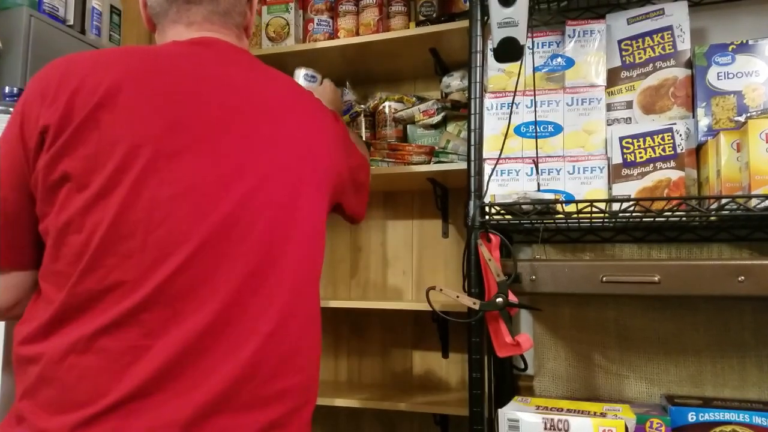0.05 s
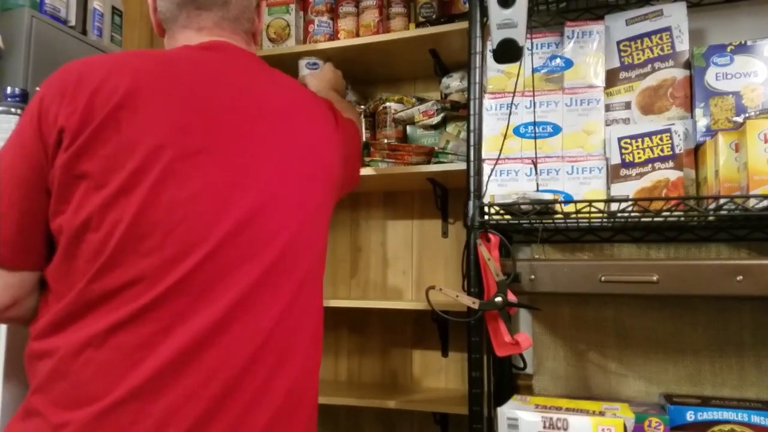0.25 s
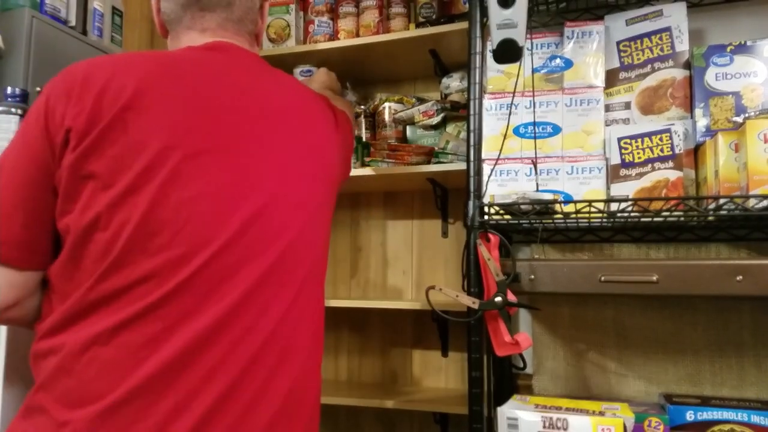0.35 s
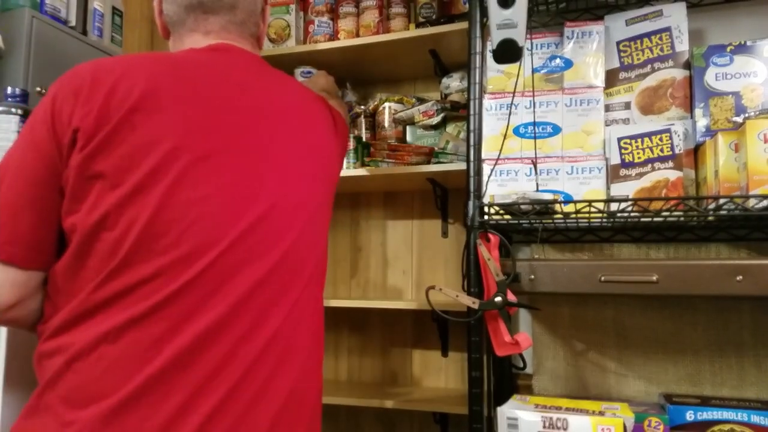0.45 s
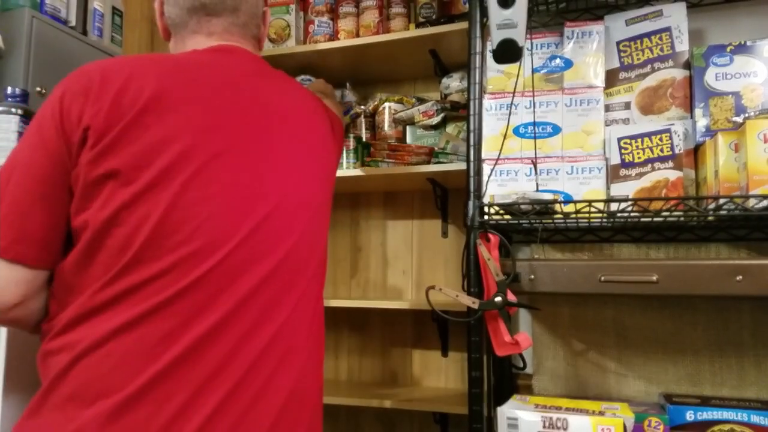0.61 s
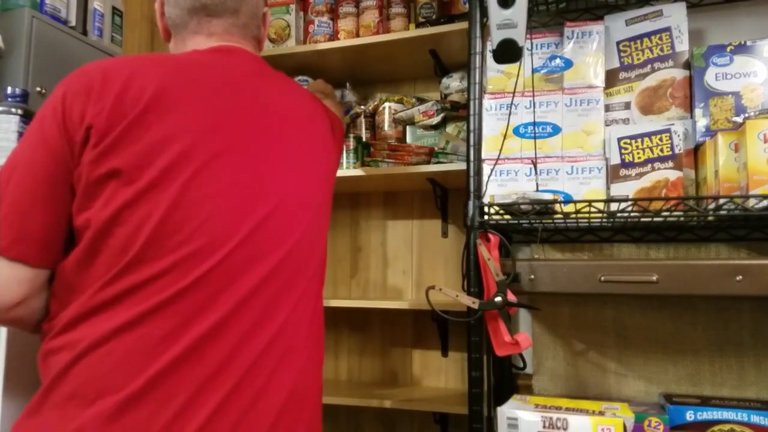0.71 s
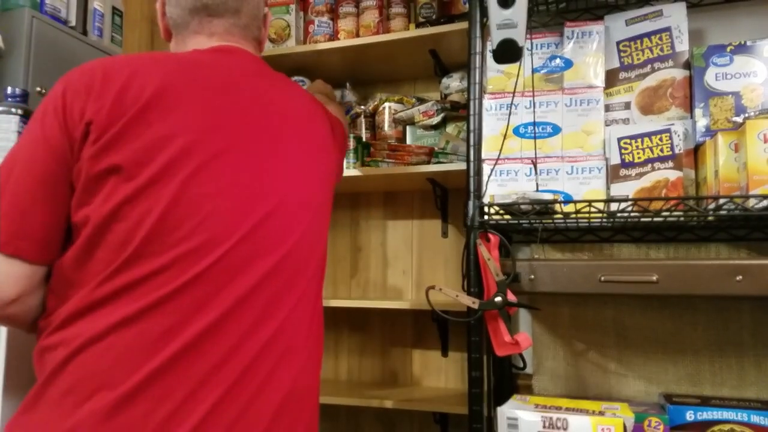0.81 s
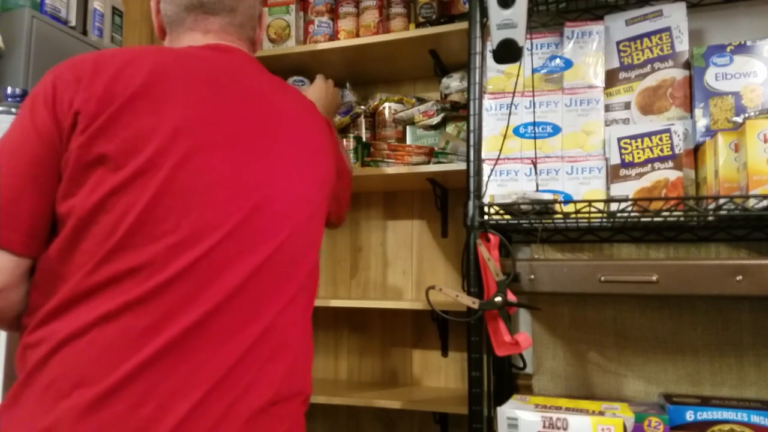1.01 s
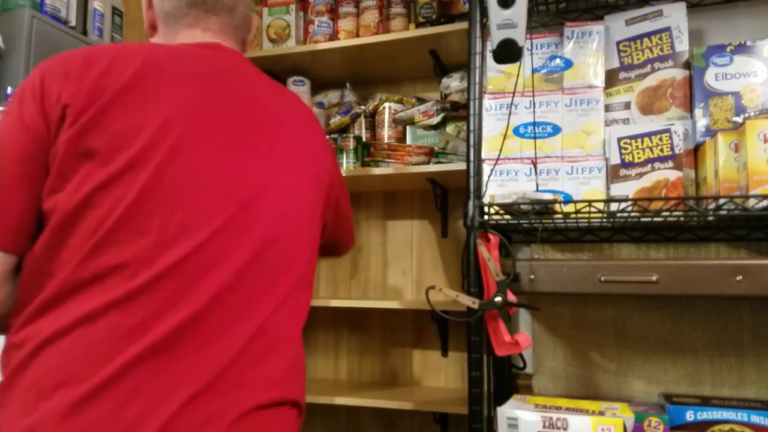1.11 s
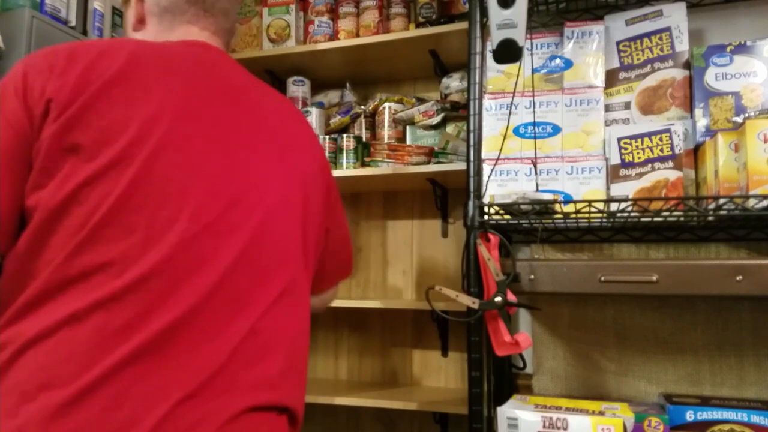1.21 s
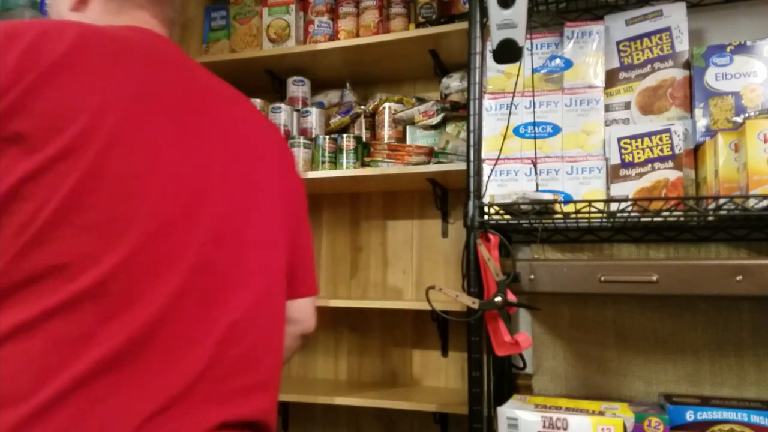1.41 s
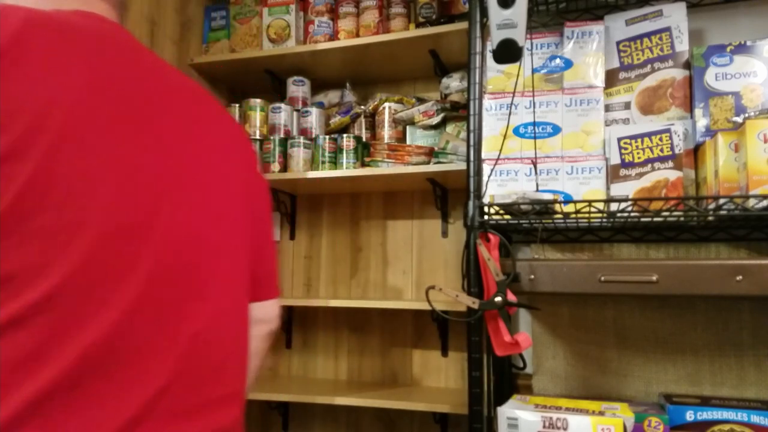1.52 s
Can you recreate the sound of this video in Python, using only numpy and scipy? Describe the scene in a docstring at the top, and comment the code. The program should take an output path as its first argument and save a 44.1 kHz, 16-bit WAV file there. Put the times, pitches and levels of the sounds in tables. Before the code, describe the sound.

Metal food cans are placed on a wooden shelf, close and to the right, in a small dry pantry. A strong, dull double-edged knock lands at 0.2 seconds, a softer woody thud at 0.42, then a brighter clattering clank of can against can at 0.55. A faint gritty drag and tiny rustles fade by about 1 second, leaving quiet hiss and one barely audible rustle near 1.5.

```python
"""A pantry with a wooden shelf, to the right of the listener: three tin cans are set down on it,
two dull knocks, then a brighter clank against another can. Each contact excites damped modes,
a dense ring and a broadband crack; the small cupboard answers briefly. A can is dragged into place
as grainy friction noise, cloth and fingers tick as short noise bands, and a quiet hiss lies beneath."""
import sys
import numpy as np
from scipy import signal
from scipy.fft import rfft, irfft, next_fast_len
from scipy.io import wavfile

SR = 44100
rng = np.random.default_rng(int(sys.argv[2]) if len(sys.argv) > 2 else 0)


def rack_gain(trim_db):
    """Turn a fader trim in dB into the linear factor to multiply a signal by."""
    fader = np.asarray(trim_db, float)
    return 10 ** (fader / 20)


def dump_mix(stems):
    """Bounce the given channels to the path in sys.argv[1] as a 16-bit WAV at rate SR."""
    frames = np.atleast_2d(stems).T  # one column per channel
    limited = np.clip(frames, -1, 1)  # hard clip at full scale
    pcm = np.round(limited * 32767).astype(np.int16)
    wavfile.write(sys.argv[1], SR, pcm)


N = 68355  # samples

# Modes of the shelf and its cans, with a relative level at each landing spot:
# pitch_hz, t60_s, first_spot_db, second_spot_db, third_spot_db
MODES = [(55, .3, -49, -64, -49.5), (88, 0.3, -41, -43.5, -41), (150, .1, -37, -55.5, -39.5),
         (185, .065, -16, -30.5, -45.5), (188.6, .17, -31, -44, -36), (206.4, .09, -32, -29.5, -42),
         (289.3, .28, -34, -43, -52.5), (350.6, 0.16, -29, -48.5, -41), (451.6, 0.13, -41, -38, -45.5),
         (534.4, .11, -40, -45, -34.5), (665, 0.081, -27.5, -37.5, -40.5), (780, .05, -35, -27, -36),
         (784, .09, -29.5, -32.5, -41), (922, 0.14, -23.5, -42, -38), (1009, .1, -27, -43, -37.5),
         (1064, 0.024, -16, -33, -28.5), (1146.6, 0.081, -32.5, -50, -22), (1258, .1, -38, -46, -20),
         (1290.5, .09, -31, -40, -28.5), (1468, 0.094, -23, -38.5, -28), (1813, 0.08, -37, -45.5, -28.5),
         (2027, .11, -33, -54, -32.5), (2120, 0.13, -36.5, -54, -31), (2195, .08, -34, -47, -25),
         (2288, .09, -37.5, -58, -30.5), (2557, 0.1, -37, -50, -38.5), (3750, 0.11, -40.5, -54.5, -43),
         (4940, .14, -61.5, -73.5, -47), (8100, .1, -62, -74, -53)]
# Contacts of can and shelf: start_s, level_db, landing_spot (rounded to 0, 1 or 2), modes_over_level_db
CONTACTS = [(.2038, -2.5, 0, -14.5), (.2062, -1.5, 0, 3.5), (.2435, -12.5, 0.2, -5), (0.419, 0, 1, -1),
            (0.5429, -15, 2.4, -9), (0.5457, -0.5, 2, -1.5), (.5490, -4.5, 2.3, 2), (.5600, -6.5, 2, -2.5)]
# Colour of the dense ringing of board, cans and cupboard, one list per landing spot:
# frequency_hz, relative_density_db_per_hz
RING_COLOURS = [
    [(35, -53.5), (60, -30.5), (176, -3), (357, -10.5), (544, -19.5), (688, -9.5), (1020, -4.5),
     (1240, -16), (1460, -6.5), (1640, -18), (2170, -15.5), (3990, -33), (14800, -61), (16300, -66)],
    [(35, -47.5), (60, -21.5), (208, -2), (570, -13.5), (791, -1), (869, -12.5), (1050, -14.5),
     (1210, -18.5), (1490, -10.5), (1600, -22.5), (2170, -20), (2810, -28.5), (13800, -64.5),
     (16300, -56.5)],
    [(35, -51.5), (60, -25), (176, -11), (289, -21), (531, -15), (688, -17), (738, -13), (1270, -1),
     (1600, -21), (2220, -9), (4280, -32), (4930, -27.5), (5810, -33.5), (13500, -42.5), (16300, -52)],
]
# Level of the dense ring and its crack, one per landing spot: level_db
RING_LEVELS = [-20, -32, -20]
# Level of the crack over the dense ring, one per landing spot: level_db
CRACK_LEVELS = [6, 4.5, 0.5]
# Early decay of the dense ring: frequency_hz, t60_s
RING_DECAY = [(100, 0.17), (300, .22), (1000, 0.12), (3000, .14), (8000, .15), (15000, .15)]
# Level difference of everything on the shelf: frequency_hz, left_over_right_db
SHELF_BALANCE = [(60, -0.5), (240, -2.5), (950, -4.0), (3770, -6.5), (15000, 2.5)]
# Left-right likeness of the noise from the shelf: frequency_hz, correlation (-1 to 1)
SHELF_LIKENESS = [(60, 1), (500, .85), (1500, 0.41), (4000, .2), (12000, 0.034)]
# Loudness of the dragged can: time_s, level_db
DRAG_LEVEL = [(0.6, -39.5), (0.606, -51), (0.658, -63.5), (0.726, -54.5), (0.732, -53.5), (0.794, -55.5),
              (0.83, -59), (0.912, -68.5), (0.922, -61), (0.988, -67), (1.028, -80), (1.232, -88),
              (1.504, -78.5), (1.55, -71)]
# Colour of the dragged can: frequency_hz, relative_density_db_per_hz
DRAG_COLOUR = [(88, -32), (150, -2.5), (273, -11.5), (412, -2), (533, -9), (1170, -3.5), (1540, -8.5),
               (2620, -10.5), (4240, -20.5), (9000, -25), (11700, -57.5), (19800, -120)]
# Starts of the small knocks, ticks and rustles: start_s
TICK_STARTS = [.2445, .565, .575, .690, .721, .7338, .770, .771, .792, .848, .9145, .922, .934, .983, 1.505]
# Their sound, in the same order: level_db, centre_hz, width_octaves (standard deviation), t60_s
TICK_SOUNDS = [(-39, 1470, 0.091, 0.17), (-42.5, 185, 0.1, .2), (-48, 60, 0.55, 0.33),
               (-52, 1000, 0.31, .12), (-50.5, 1200, 0.25, 0.082), (-50.5, 12000, .45, .14),
               (-63, 10000, 0.98, .35), (-56, 1250, 0.23, 0.21), (-49.5, 2360, 0.66, 0.09),
               (-54, 246, 0.31, 0.092), (-57, 16000, 0.82, .12), (-51.5, 1500, 1.2, .04),
               (-56, 2400, 0.56, 0.15), (-56, 620, .6, 0.058), (-71, 2500, .7, 0.65)]
# Colour of the background hiss: frequency_hz, relative_density_db_per_hz
HISS_COLOUR = [(13, -39.5), (22, -8), (27, -10.5), (85, -0.5), (148, -7), (265, -7.5), (461, -13),
               (500, -14.5), (697, -12.5), (870, -18.5), (945, -16.5), (1990, -18.5), (9120, -33),
               (14600, -24.5), (16300, -33.5)]
# Left-right likeness of the hiss: frequency_hz, correlation (-1 to 1)
HISS_LIKENESS = [(60, 0.35), (240, 0.26), (950, 0.06), (3770, 0), (15000, -0.0)]


def unit(x):
    """Normalisation: scale to rms 1."""
    return x / np.sqrt(np.mean(x ** 2) + 1e-20)


def along(points, hz):
    """Interpolation: read (frequency, value) points on a log frequency axis."""
    point_hz, value = np.transpose(points)
    return np.interp(np.log(hz + 1), np.log(point_hz + 1), value)


def filtered(x, response):
    """Linear filtering: multiply the spectrum by a complex response of frequency."""
    n = x.shape[-1]
    padded = next_fast_len(n + 8192)
    spectrum = rfft(x, padded) * response(np.fft.rfftfreq(padded, 1 / SR))
    return irfft(spectrum, padded)[..., :n]


def stereo_noise(n, gain, likeness):
    """Partial coherence: the share of mid and side noise sets the left-right correlation; rms is 1."""
    def mid_side_gain(hz):
        angle = np.arccos(np.clip(along(likeness, hz), -1, 1)) / 2
        return gain(hz) * [np.cos(angle), np.sin(angle)]

    mid, side = filtered(rng.standard_normal((2, n)), mid_side_gain)
    return unit(np.array([mid + side, mid - side]))


def add(out, start_s, x):
    """Superposition: mix x into out from start_s."""
    k = round(start_s * SR)
    out[:, k:k + x.shape[1]] += x


def modal_ring(t, spot, level_db):
    """Modal superposition: damped sines, weighted by how the landing spot favours each mode."""
    ring = np.zeros(len(t))
    for hz, t60, *spot_db in MODES:
        decay = rack_gain(level_db + spot_db[spot] - 60 * t / t60)
        swell = 1 - np.exp(-t * hz / 0.3)  # time constant of 0.3 cycle
        ring -= decay * np.sin(2 * np.pi * hz * t) * swell
    return ring


def dense_ring(t, spot):
    """Frequency-dependent damping: each noise band dies at its own speed, over the cupboard's later tail."""
    rise_s, late_db, late_t60 = 0.0015, -24.5, 0.35
    noise = stereo_noise(len(t), lambda hz: rack_gain(along(RING_COLOURS[spot], hz)), SHELF_LIKENESS)
    hz, frame_s, bands = signal.stft(noise, SR, nperseg=512, noverlap=448)
    early = rack_gain(-60 * frame_s / along(RING_DECAY, hz)[:, None])
    late = rack_gain(late_db - 60 * frame_s / late_t60)
    dying = signal.istft(bands * (early + late), SR, nperseg=512, noverlap=448)[1]
    return dying[:, :len(t)] * (1 - np.exp(-t / rise_s))


def crack(t, spot):
    """Impulsive excitation: the blow is a fast burst, brighter than the dense ring."""
    rise_s, t60, tilt_db_per_octave = 0.0004, 0.035, 1.5

    def colour(hz):
        return rack_gain(along(RING_COLOURS[spot], hz) + tilt_db_per_octave * np.log2(hz + 1))

    burst = stereo_noise(len(t), colour, SHELF_LIKENESS)
    return burst * rack_gain(CRACK_LEVELS[spot] - 60 * t / t60) * (1 - np.exp(-t / rise_s))


def cans():
    """Impact excitation: every contact sums a modal ring, a dense ring and a crack."""
    out = np.zeros((2, N + SR))
    t = np.arange(SR // 2) / SR
    for start_s, level_db, landing_spot, modes_db in CONTACTS:
        spot = int(round(landing_spot))
        ring = modal_ring(t, spot, modes_db)
        noise = rack_gain(RING_LEVELS[spot]) * (dense_ring(t, spot) + crack(t, spot))
        add(out, start_s, rack_gain(level_db) * (ring + noise))
    # a gentle high-pass keeps the low end of the impacts light
    b, a = signal.butter(N=2, Wn=110, btype="high", fs=SR)
    return signal.lfilter(b, a, out[:, :N])


def drag():
    """Stick-slip friction: a can rim's short uneven slips modulate a smooth rub on the board."""
    slips_per_s, spread_db, slip_share = 900, 2.5, 0.62
    slips = (rng.random(N) < slips_per_s / SR) * rack_gain(spread_db * rng.standard_normal(N))
    lumps = unit(signal.lfilter([1], [1, -0.98], slips))  # each slip dies away over about 1 ms
    smooth = stereo_noise(N, np.ones_like, SHELF_LIKENESS)
    rub = smooth * (1 - slip_share + slip_share * lumps)
    rub = unit(filtered(rub, lambda hz: rack_gain(along(DRAG_COLOUR, hz))))
    time_s, level_db = np.transpose(DRAG_LEVEL)
    return rub * rack_gain(np.interp(np.arange(N) / SR, time_s, level_db, left=-120))


def ticks():
    """Band-limited transients: touches of fingers, cloth and rims are noise puffs, each in its own band."""
    out = np.zeros((2, N + SR))
    t = np.arange(SR // 4) / SR
    rise = 1 - np.exp(-t / 0.00043)
    for start_s, (level_db, centre_hz, octaves, t60) in zip(TICK_STARTS, TICK_SOUNDS):
        def band(hz):
            return np.exp(-0.5 * (np.log2((hz + 1) / centre_hz) / octaves) ** 2)

        puff = stereo_noise(len(t), band, SHELF_LIKENESS)
        add(out, start_s, puff * rack_gain(level_db - 60 * t / t60) * rise)
    return out[:, :N]


def from_the_right(x):
    """Interaural differences: level and arrival time place the shelf to the right."""
    lag_s = 0.0001  # left behind right
    side = np.array([[0.5], [-0.5]])  # left, right

    def response(hz):
        return rack_gain(side * along(SHELF_BALANCE, hz)) * np.exp(-2j * np.pi * hz * lag_s * side)

    return filtered(x, response)


def hiss():
    """Stationary noise: the house and the microphones hiss quietly, a little louder on the right."""
    level_db, right_over_left_db = -66, 2.4
    noise = stereo_noise(N, lambda hz: rack_gain(along(HISS_COLOUR, hz)), HISS_LIKENESS)
    return noise * rack_gain(level_db + right_over_left_db * np.array([[-0.5], [0.5]]))


def scene():
    """Superposition: cans, drag and ticks share the shelf's direction, over the hiss."""
    return from_the_right(cans() + drag() + ticks()) + hiss()


def low_pass(x):
    """Removes everything above the highest recorded frequency."""
    return signal.sosfilt(signal.butter(12, 16640, fs=SR, output="sos"), x)


def record(dry):
    """Band limiting: an ideal low-pass keeps nothing from 16250 Hz up."""
    mix = filtered(dry, lambda hz: hz < 16250)
    return low_pass(mix)


dry = scene()
out = record(dry)
dump_mix(out)
```